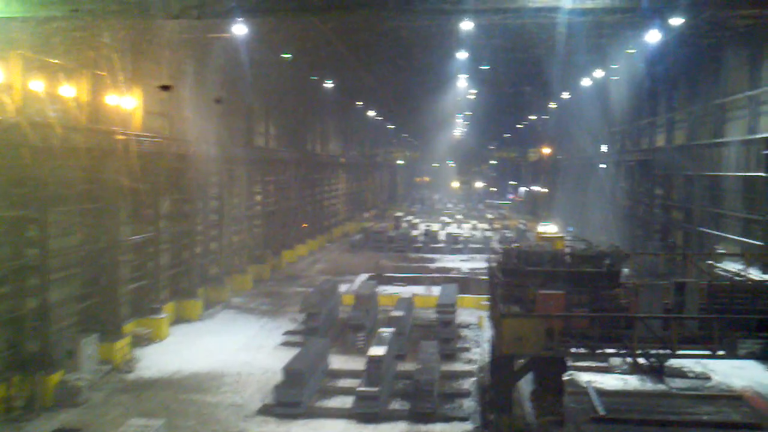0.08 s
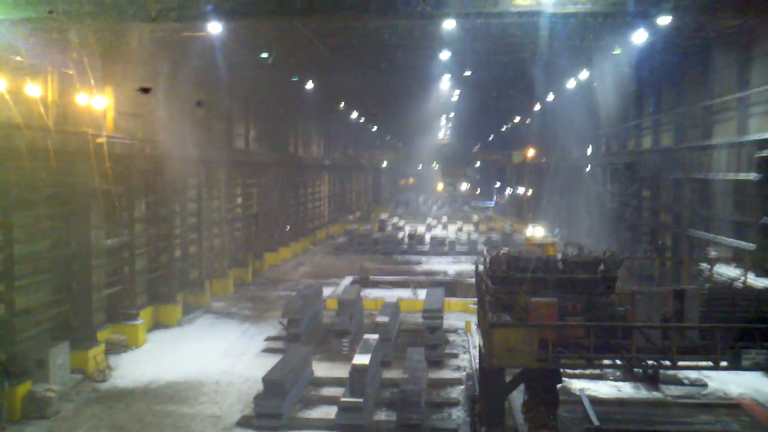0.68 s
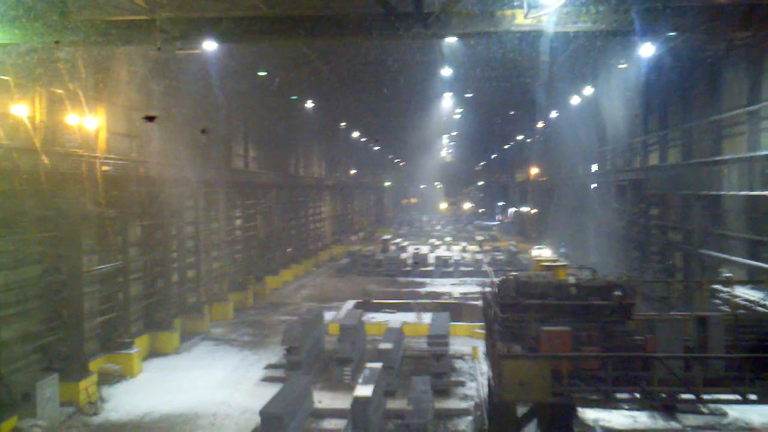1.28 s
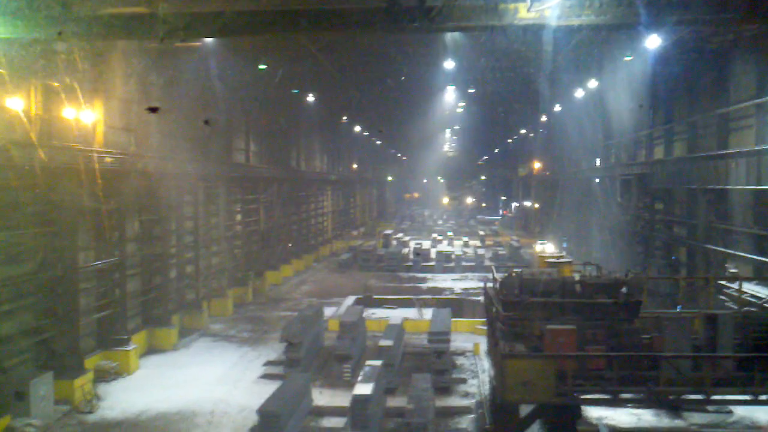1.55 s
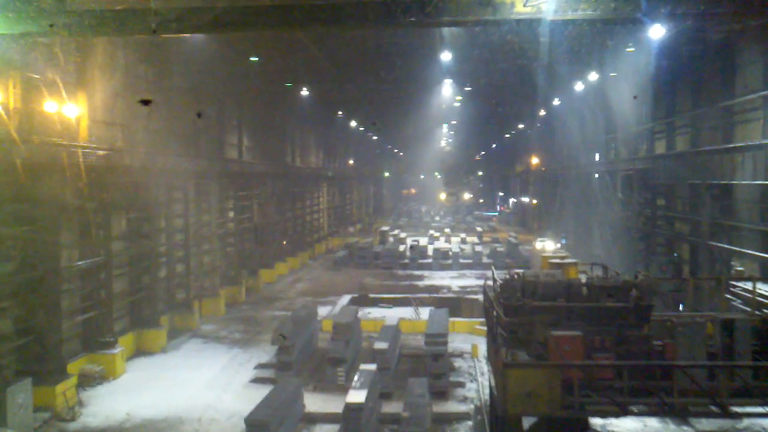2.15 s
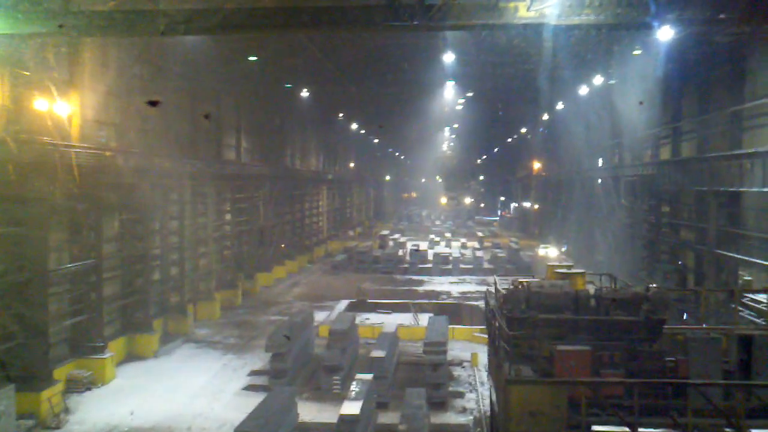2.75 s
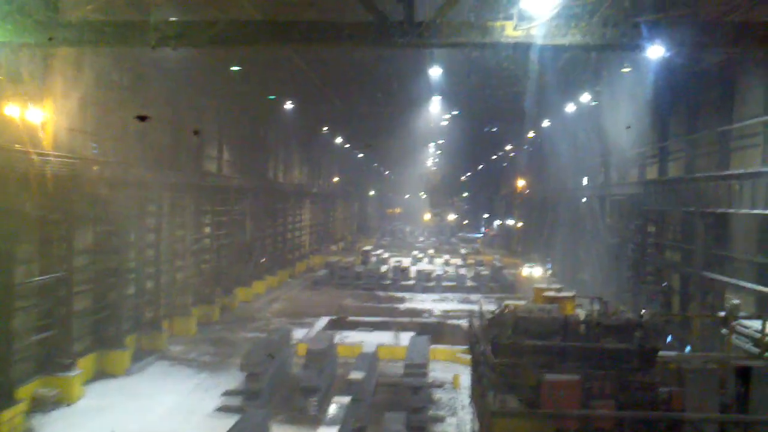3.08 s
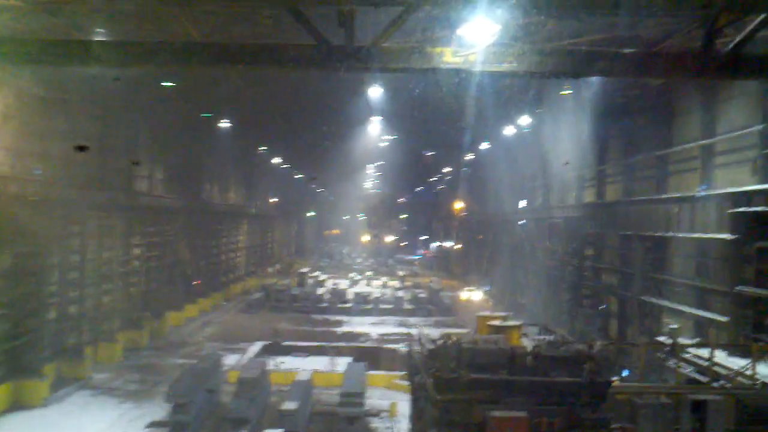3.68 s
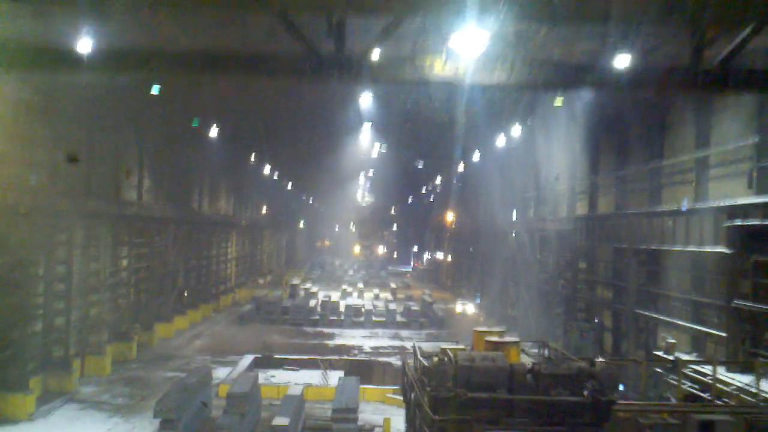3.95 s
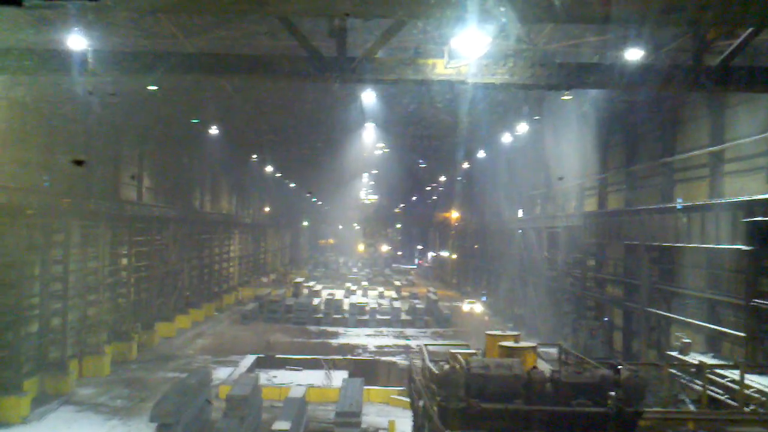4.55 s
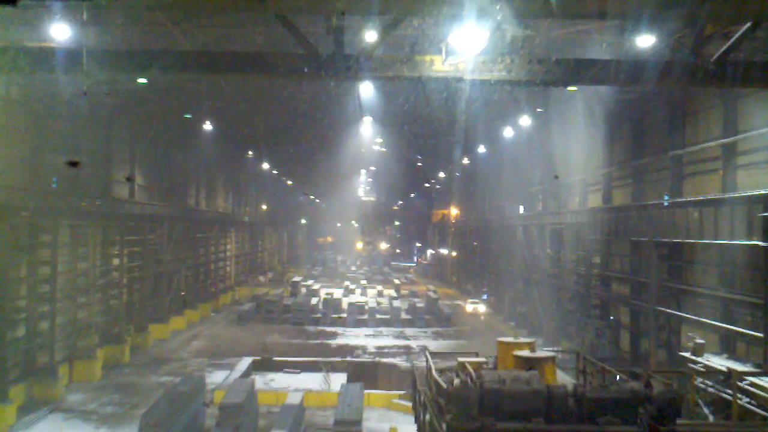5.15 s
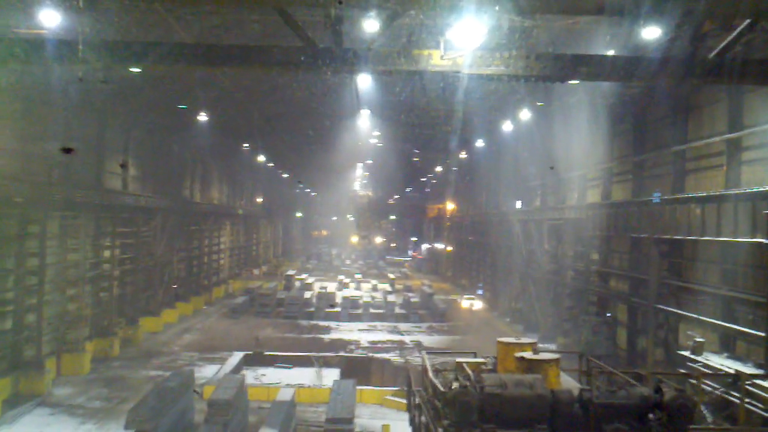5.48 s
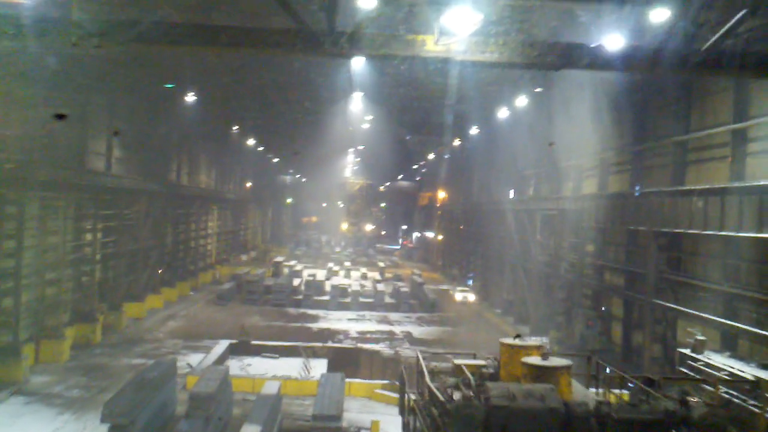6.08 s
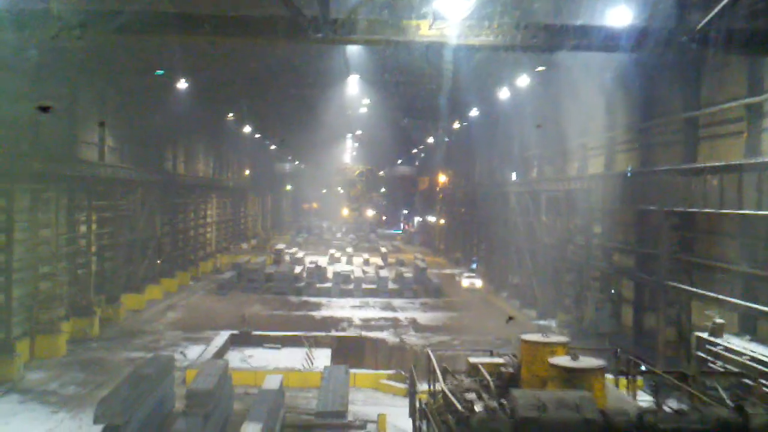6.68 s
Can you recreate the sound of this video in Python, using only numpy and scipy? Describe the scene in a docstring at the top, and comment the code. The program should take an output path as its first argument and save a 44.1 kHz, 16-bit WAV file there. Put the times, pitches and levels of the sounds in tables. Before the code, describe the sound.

An overhead crane grinds and rumbles along steel rails, heard from its cab, with irregular clanking jolts over a wavering gear hum.

```python
"""Steel wheels of an overhead crane grind down a steel-plant bay, heard from the cab. Rail roughness and jolts
on rail flaws ring the girder, the cab panels and the wheels. Flanges rub the rail side with a hiss and short
rasps; dry steel slips and squeaks. Underneath, the cab rumbles and booms, the travel gearing hums with a
wavering pitch and a cab panel drones."""
import sys
import numpy as np
from scipy.fft import rfft, irfft
from scipy.io import wavfile
from scipy.ndimage import map_coordinates

SR = 44100
rng = np.random.default_rng(int(sys.argv[2]) if len(sys.argv) > 2 else 0)


def dump_mix(stems):
    """Bounce the given channels to the path in sys.argv[1] as a 16-bit WAV at rate SR."""
    frames = np.atleast_2d(stems).T  # one column per channel
    limited = np.clip(frames, -1, 1)  # hard clip at full scale
    pcm = np.round(limited * 32767).astype(np.int16)
    wavfile.write(sys.argv[1], SR, pcm)


N = 300762
T = np.arange(N) / SR
FREQ = np.maximum(np.arange(N // 2 + 1) * SR / N, 1)


# grinding spectrum: (frequency [Hz], relative density [dB])
GRIND_SPECTRUM = [(150, -39), (400, -5), (700, -0.5), (1000, -0.5), (1500, -4.5), (2300, -4), (3000, -8),
                  (4000, -18), (5500, -19.5), (13000, -58)]
# girder and cab-panel modes: (frequency [Hz], relative level [dB])
STEEL_MODES = [(410, 0), (457, 7), (492, 0.5), (545, -3.5), (625, 5), (655, 3.5), (716, 5), (765, -1),
               (864, -2.5), (932, 0), (977, 1), (1050, -0.5), (1190, 0.9), (1255, -9.5), (1340, -2),
               (1436, -0.5), (1533, -5.5), (1580, -3.5), (1678, -4.5), (1770, -3), (2320, -2), (2900, -4),
               (3692, -10), (4420, -13)]

def wheels(roll_db, jolts, judder_db=1.84):
    """Rail roughness and jolts shake the girder into its modes; jolts ring it more than they grind."""
    rolling = undb(roll_db - 0.03 + judder_db * walk(32))
    roughness = through(contacts(per_s=8000, spread_db=0.14), undb(spectrum(GRIND_SPECTRUM)))
    grind = np.hypot(rolling, undb(-2) * jolts) * roughness
    force = np.hypot(rolling, undb(3.5) * jolts)
    girder = modes(STEEL_MODES, width_hz=16) * resonance(500, 3900)
    ring = flexing(through(force * contacts(per_s=3200, spread_db=1.5), girder))
    return undb(-1.5) * grind + undb(-4) * ring * rms(force)


def flexing(pair, lag_s=0.00022):
    """The girder flexes as it travels, so its ringing drifts in pitch."""
    position = (T + lag_s * walk(2.9)) * SR
    return np.array([map_coordinates(x, [position], order=1, mode="nearest") for x in pair])


# grinding between jolts: (time [s], relative level [dB])
ROLL_LEVEL = [(0, -37.5), (.22, -37.5), (.42, -31), (.58, -34.5), (.69, -29), (.95, -33), (1.3, -28.5),
              (2.21, -25), (2.31, -34.5), (2.82, -35.5), (2.87, -31), (3.11, -29), (3.18, -33.5),
              (3.76, -28.5), (4.22, -31), (4.49, -29), (4.6, -28.5), (5.37, -28), (5.61, -35), (5.92, -27),
              (6, -30), (6.47, -32.5), (6.82, -31.5)]
# jolts on rail flaws: (time [s], level [dB], decay [s], wheel ring re jolt [dB])
RAIL_JOLTS = [(0.307, -27.5, 0.039, -19), (0.388, -33, 0.016, 3), (0.615, -33, .025, -18),
              (0.682, -21.5, 0.052, -23), (0.775, -16.5, 0.02, -11), (0.797, -19.5, 0.013, -12),
              (0.882, -22.5, 0.041, -22), (0.965, -28, 0.049, -18), (1.045, -21.5, 0.046, -25),
              (1.115, -19, 0.034, -25), (1.37, -28, 0.023, -18), (1.448, -21, 0.038, -12),
              (1.553, -14, 0.021, -18), (1.59, -28, 0.017, -14), (1.655, -24, .025, -16),
              (1.72, -18.5, 0.032, -4.5), (1.758, -23.5, 0.035, -4), (1.893, -19.5, 0.051, -1),
              (1.942, -14.5, 0.04, -14), (1.988, -17, 0.019, -15), (2.09, -21.5, 0.019, -1),
              (2.157, -17.5, 0.026, -7), (2.187, -19, 0.019, -14), (2.366, -24.5, 0.029, -27),
              (2.451, -27, 0.11, -19), (2.59, -27, 0.014, -1.5), (2.64, -44, 0.023, -12),
              (2.981, -20.5, 0.035, -1), (3.05, -27, 0.072, 3), (3.216, -25, 0.078, -15),
              (3.315, -23, 0.034, -16), (3.493, -23, 0.017, -18), (3.578, -24.5, 0.032, -7),
              (3.655, -22, 0.02, -16), (3.718, -22.5, 0.027, -6), (3.8, -30, 0.022, -17),
              (3.915, -23, 0.021, -22), (4.02, -28, 0.13, -10), (4.135, -31, 0.014, -14),
              (4.314, -23, 0.033, -23), (4.385, -35, 0.019, -21), (4.51, -25.5, 0.085, -14),
              (4.56, -18.5, 0.059, -3), (4.638, -21, 0.039, -2), (4.712, -23.5, 0.04, -9),
              (4.765, -21, 0.039, -19), (4.825, -16, 0.02, -14), (4.933, -20, 0.073, -7),
              (5.038, -25.5, 0.032, 2.5), (5.12, -18.5, 0.022, -10), (5.168, -19, 0.029, -14),
              (5.225, -25, 0.036, -3), (5.265, -15.5, 0.016, -19), (5.315, -21.5, 0.016, -7),
              (5.418, -26, 0.072, 0), (5.471, -25, 0.079, -1), (5.645, -28.5, 0.045, -23),
              (5.75, -25, 0.015, -16), (5.805, -25.5, 0.086, -15), (5.872, -23, 0.059, 2.5),
              (6.035, -25, 0.089, -5), (6.18, -22, 0.086, -1), (6.323, -21, 0.024, -4.5),
              (6.385, -20, 0.022, -20), (6.519, -22, 0.084, -10), (6.594, -19, 0.072, -27),
              (6.722, -21.5, 0.053, -16)]

def rail_contact(attack_s=0.0029):
    """Wheel-on-rail excitation: rolling level in dB, and the amplitude of jolts whose powers add."""
    power = np.zeros(N)
    for start_s, db, decay_s, _ in RAIL_JOLTS:
        part, age = after(start_s, 1)
        power[part] += (undb(db) * pulse(age, attack_s, decay_s)) ** 2
    return curve(ROLL_LEVEL), np.sqrt(power)


# struck-wheel modes: (frequency [Hz], relative level [dB], decay [s])
WHEEL_MODES = [(795, -5.5, 0.078), (867, -2.5, 0.062), (920, -3, 0.042)]

def wheel_ring(detune=0.0105, attack_s=0.0068):
    """Each jolt rings a wheel, at a slightly different pitch as the load shifts."""
    out = np.zeros((2, N))
    for start_s, jolt_db, _, ring_db in RAIL_JOLTS:
        part, age = after(start_s, 0.43)
        for hz, mode_db, decay_s in WHEEL_MODES:
            shift, start_cycles = rng.standard_normal(2)
            tone = np.sin(2 * np.pi * (hz * (1 + detune * shift) * age + start_cycles))
            out[0, part] += undb(jolt_db + ring_db + mode_db) * tone * pulse(age, attack_s, decay_s)
    return out


# flange hiss spectrum: (frequency [Hz], relative density [dB])
HISS_SPECTRUM = [(800, -10), (2500, 4), (3700, -1), (4500, -8), (5200, -13), (5750, -5), (6400, 2.2),
                 (7500, 2), (9500, 1.4), (11000, -5), (12500, -5), (14000, -14)]
# flange bites: (time [s], relative level [dB], length [s], ring re rasp [dB])
FLANGE_BITES = [(0.318, -42, 0.039, -13), (0.438, -40.5, 0.053, -17), (0.684, -37, 0.081, -10),
                (0.959, -45, 0.041, 4.5), (1.014, -39.5, 0.047, -12), (1.349, -35.5, 0.025, -5),
                (1.494, -32.5, 0.055, -6), (1.571, -32.5, 0.034, 0), (1.698, -31.5, 0.04, -19),
                (1.86, -34, 0.079, -4), (2.119, -36, 0.042, -10), (2.154, -34.5, .035, -13),
                (2.442, -43.5, 0.19, -12), (2.99, -42.5, 0.03, 6.5), (3.111, -36.5, 0.037, -20),
                (3.388, -46, 0.027, 5), (3.6, -39, 0.022, -16), (3.637, -42, 0.039, 3),
                (3.726, -35, 0.028, -16), (4.015, -37.5, 0.041, 6), (4.104, -40, 0.024, -2),
                (4.51, -34, 0.033, -5), (4.557, -32.5, 0.097, -5), (4.636, -31, 0.03, 1.5),
                (4.741, -40.5, 0.022, 10), (4.82, -46, 0.016, 6), (5.002, -33.5, 0.022, -10),
                (5.044, -40.5, 0.019, 7), (5.17, -33.5, .03, -8), (5.224, -27, 0.036, -1.5),
                (5.33, -40.5, 0.014, 6), (5.438, -36.5, 0.056, -13), (5.717, -46, 0.024, 0),
                (5.84, -35, 0.026, -4), (5.926, -37, 0.02, 4.5), (6.076, -34.5, 0.05, -13),
                (6.13, -39, 0.052, -10), (6.176, -36, 0.1, -14), (6.326, -42, 0.018, 7),
                (6.544, -40, 0.061, -10)]

def flanges(roll_db, jolts, attack_s=0.0076, release_s=0.019, hiss_db_per_s=1.28, rub_db_per_s=1.61):
    """Flanges hiss and rub on the rail side with the rolling; bites rasp and ring the steel."""
    colour = undb(spectrum(HISS_SPECTRUM))
    steel = resonance(3050, 1800) + undb(-1) * resonance(3960, 1400)
    chatter_db = 1.4 * walk(30)
    load_db = 0.82 * (roll_db + 30) + chatter_db  # about 0 dB at the usual rolling level
    hiss_gain = np.hypot(undb(-42.5 + load_db + hiss_db_per_s * T), undb(-30) * jolts)
    rub_gain = undb(-51.5 + load_db + rub_db_per_s * T)
    rasp = through(contacts(per_s=9000, spread_db=1.5), colour)
    ring, rub = (through(contacts(per_s=6600, spread_db=-1), steel) for _ in range(2))
    hiss = through(contacts(per_s=9000, spread_db=0), colour)
    out = hiss_gain * hiss + rub_gain * rub
    for start_s, db, length_s, ring_db in FLANGE_BITES:
        part, age = after(start_s, 0.4)
        grip = np.clip(age / attack_s, 0, 1) * np.exp(-np.maximum(age - length_s, 0) / release_s)
        out[:, part] += undb(db + 1.5) * grip * (rasp[:, part] + undb(ring_db) * ring[:, part])
    return out


# dry slips: (time [s], starting pitch [Hz], level [dB], decay [s], scratchiness [0-1])
DRY_SLIPS = [(4.874, 10200, -34, .015, .6), (4.892, 9800, -23, .018, 0.6), (4.925, 9800, -33, .015, .7),
             (5.272, 10400, -26, .025, .9), (5.318, 9950, -26, 0.014, 0.5), (5.335, 9600, -23, .012, .3),
             (5.39, 9660, -12, 0.01, 0), (5.418, 9350, -27, 0.02, .5)]

def squeaks(waver_hz=170, sag_hz_per_s=6200, attack_s=0.0014):
    """Dry steel slips and sings: an abrupt, sagging tone that turns to a scratch when slip is uneven."""
    out = np.zeros((2, N))
    offset_hz = waver_hz * np.array([walk(500), walk(500)])
    grit = np.array([walk(800), walk(800)])
    for start_s, hz, db, decay_s, scratch in DRY_SLIPS:
        part, age = after(start_s, 0.5)
        phase = phase_of(hz - sag_hz_per_s * age + offset_hz[:, part])
        slip = np.sqrt(1 - scratch) * np.sin(phase) + np.sqrt(scratch) * grit[:, part] * np.cos(phase)
        out[:, part] += undb(db) * slip * pulse(age, attack_s, decay_s)
    return out


# low cab-panel modes: (frequency [Hz], relative level [dB])
PANEL_MODES = [(155, 0), (172, -1.5), (203, -5), (256, -1), (292, -7.5), (312, -1), (328, -10.5)]
# rumble spectrum: (frequency [Hz], relative density [dB])
RUMBLE_SPECTRUM = [(25, -52), (45, -38), (62, -25), (80, -8), (100, -5), (120, -4.5), (137, -12),
                   (200, -4.5), (320, -1), (400, -0.5), (600, -3.5), (1500, -42)]
# rumble between jolts: (time [s], relative level [dB])
RUMBLE_LEVEL = [(0.0, -37), (0.06, -36.5), (0.33, -34.5), (2.01, -28), (2.37, -35.5), (2.58, -31),
                (2.76, -37), (2.88, -30.5), (3.3, -33), (3.63, -30), (4.5, -31.5), (4.56, -31.5),
                (5.49, -32), (5.58, -36), (5.88, -29.5), (6.48, -31.5), (6.57, -32), (6.81, -28.5)]

def cab_rumble(jolts):
    """Cab panels rumble, harder at each jolt."""
    shake = np.hypot(undb(curve(RUMBLE_LEVEL)), undb(-15) * jolts)
    response = modes(PANEL_MODES, width_hz=11.8) * resonance(261, 317) ** 2
    panels = through(contacts(per_s=1500, spread_db=3.5), response)
    broadband = through(rng.standard_normal((2, N)), undb(spectrum(RUMBLE_SPECTRUM)))
    return (panels + undb(-0.44) * broadband) * shake


# cab boom: (time [s], relative level [dB])
BOOM_LEVEL = [(0.0, -49), (0.07, -43), (0.11, -59), (0.3, -51), (1.01, -38.5), (1.03, -46), (1.48, -34.5),
              (1.63, -44.5), (2.53, -43), (2.58, -35), (3.1, -47), (3.15, -35), (3.25, -50), (3.53, -32.5),
              (3.61, -41), (3.95, -41.5), (3.99, -37), (4.18, -46.5), (4.31, -43), (4.44, -52), (4.56, -37),
              (4.67, -47), (4.75, -40), (4.78, -54), (4.94, -34), (5.09, -48.5), (5.62, -42), (5.68, -31),
              (5.76, -41.5), (6.82, -40.5)]

def cab_boom(hum_hz=86.5, waver_hz=2.85):
    """An unsteady drive hum booms in the cab's air."""
    hum = unit(np.sin(phase_of([hum_hz + waver_hz * walk(10.8) for _ in range(2)])))
    air = through(rng.standard_normal((2, N)), resonance(86.7, 24) ** 2)
    return (undb(-0.9) * hum + undb(-6.5) * air) * undb(curve(BOOM_LEVEL))


# gear-mesh pitch: (time [s], frequency [Hz])
MESH_PITCH = [(0, 349), (.6, 344.8), (1, 341.3), (1.45, 342.6), (1.9, 341), (2.2, 344), (2.8, 346.8),
              (3.3, 345.5), (3.55, 338), (4, 347), (4.35, 339), (4.85, 338), (5.1, 337), (5.25, 342),
              (5.8, 348), (6.3, 345.5), (6.65, 340), (6.82, 347)]
# gear hum: (time [s], relative level [dB])
MESH_LEVEL = [(0.0, -38), (0.05, -33), (0.14, -43), (0.3, -37.5), (0.5, -27.5), (0.64, -45), (0.78, -27.5),
              (0.85, -35), (0.92, -30.5), (1.1, -35), (1.25, -30), (1.4, -31), (1.53, -24), (1.63, -37),
              (1.77, -42), (1.95, -28), (2.15, -28.5), (2.3, -41), (2.45, -36), (2.8, -32.5), (2.93, -37),
              (3.01, -31.5), (3.2, -38), (3.27, -28.5), (3.38, -29), (3.52, -29), (3.6, -53), (3.8, -31.5),
              (3.97, -22.5), (4.06, -30), (4.19, -44), (4.32, -25.5), (4.45, -42), (4.62, -26), (4.73, -37),
              (4.86, -25.5), (5.12, -36), (5.2, -22), (5.28, -27), (5.42, -47), (5.91, -32), (6.06, -53),
              (6.22, -28.5), (6.43, -33), (6.55, -36), (6.68, -22.5), (6.81, -31)]

def gearing(waver_hz=4.07, throb_db=2.5):
    """The gear mesh hums, wavering and throbbing with the load."""
    tone = np.sin(phase_of(curve(MESH_PITCH) + waver_hz * walk(23.4)))
    throb = undb(throb_db * walk(18))
    return unit(tone * throb) * undb(curve(MESH_LEVEL) - 2.6)


# panel drone: (time [s], relative level [dB])
DRONE_LEVEL = [(0, -45), (.3, -34), (.55, -35), (.75, -28), (.85, -37), (1.08, -33), (1.28, -39.5),
               (1.43, -25), (1.5, -38), (1.72, -28), (2, -26), (2.12, -44), (2.4, -37), (2.63, -31.5),
               (2.75, -39), (2.91, -28), (3.05, -36), (3.35, -38), (3.52, -36), (3.73, -27.5), (3.87, -34),
               (4.17, -30), (4.27, -39), (4.6, -29), (4.75, -38), (5.3, -32), (5.62, -46), (5.75, -36),
               (6.1, -30), (6.2, -49), (6.6, -29.5), (6.82, -35)]

def panel_drone(hz=236, waver_hz=6.54):
    """A cab panel drones below the gear hum, swelling and wavering with the load."""
    tone = np.sin(phase_of([hz + waver_hz * walk(17.7) for _ in range(2)]))
    return unit(tone) * undb(curve(DRONE_LEVEL) - 3.5)


# phase between microphone ports: (frequency [Hz], left lead [rad])
LEFT_LEAD = [(85, -.7), (135, 0.2), (157, 2.3), (180, 0.9), (215, 0.76), (450, 0.35), (1350, 0.12),
             (1800, -1.3), (2400, -2.7), (2550, -3.13), (2790, -3.15), (3250, -3.95), (3600, -6.25),
             (4250, -6.25), (4650, -3.6), (5400, -3), (6200, 0), (7000, 1.4)]
# likeness of the ports: (frequency [Hz], coherence [0-1])
COHERENCE = [(90, 0.76), (135, 0.27), (157, 0.61), (180, 0.17), (212, 0.96), (240, 0.54), (275, 1),
             (305, 0.87), (345, 0.59), (470, 0.44), (600, 0.78), (1350, 1), (1800, 0.68), (2480, 1),
             (2790, 0.98), (3350, 0.02), (3950, 1), (4600, 0.26), (5250, 0.81), (6000, 0.093)]

def ports(pair):
    """Mix a shared stream (row 0) and a diffuse one (row 1) into the left and right ports."""
    coherence = spectrum(COHERENCE)
    shared, diffuse = rfft(pair) * np.sqrt([(1 + coherence) / 2, (1 - coherence) / 2])
    turn = np.exp(0.5j * spectrum(LEFT_LEAD))
    return irfft([(shared + diffuse) * turn, (shared - diffuse) / turn], N)


def contacts(per_s, spread_db):
    """Two independent streams of tiny steel-on-steel impacts of uneven size."""
    struck = rng.random((2, N)) < per_s / SR
    size = undb(spread_db * np.minimum(rng.exponential(size=(2, N)), 4))
    return unit(struck * size * rng.standard_normal((2, N)))


def resonance(hz, width_hz):
    """Response of one damped mode, gain 1 at its centre."""
    return 1 / (1 + 1j * (FREQ ** 2 - hz ** 2) / (FREQ * width_hz))


def modes(table, width_hz):
    """Causal response of resonances whose powers add."""
    power = sum(np.abs(undb(db) * resonance(hz, width_hz)) ** 2 for hz, db in table)
    cepstrum = irfft(np.log(power) / 2, N)
    return np.exp(rfft(2 * cepstrum[:N // 2], N))


def through(x, response):
    """Filter, then scale to rms 1."""
    return unit(irfft(rfft(x) * response, N))


def walk(rate_hz):
    """Smooth random drift, rms 1."""
    return through(rng.standard_normal(N), np.exp(-(FREQ / rate_hz) ** 2))


def pulse(age, attack_s, decay_s):
    """Exponential rise and decay."""
    return (1 - np.exp(-age / attack_s)) * np.exp(-age / decay_s)


def after(start_s, length_s):
    """Sample slice from a moment on, and its ages in seconds."""
    part = slice(int(start_s * SR), int((start_s + length_s) * SR))
    return part, T[part] - T[part][0]


def phase_of(hz):
    """Running phase in radians."""
    return 2 * np.pi * np.cumsum(hz, axis=-1) / SR


def curve(table):
    """Time table at every sample."""
    return np.interp(T, *np.transpose(table))


def spectrum(table):
    """Frequency table at every bin, joined on a log axis."""
    hz, value = np.transpose(table)
    return np.interp(np.log(FREQ), np.log(hz), value)


def undb(db):
    """Decibels to gain."""
    return 10 ** (db / 20)


def rms(x):
    """Root mean square."""
    return np.sqrt(np.mean(x ** 2))


def unit(x):
    """Scale to rms 1."""
    return x / rms(x)


def scene():
    """Rolling and jolts drive wheels and flanges, jolts shake the cab; gearing and a panel drone hum below."""
    roll_db, jolts = rail_contact()
    rail = wheels(roll_db, jolts) + wheel_ring() + flanges(roll_db, jolts) + squeaks()
    body = cab_rumble(jolts) + cab_boom() + panel_drone()
    return ports(rail + body) + gearing()


def record(dry, cutoff_hz=13950, edge_hz=100):
    """Steep low-pass."""
    return irfft(rfft(dry) * np.clip((cutoff_hz - FREQ) / edge_hz + 0.5, 0, 1), N)


dry = scene()
out = record(dry)
dump_mix(out)
```